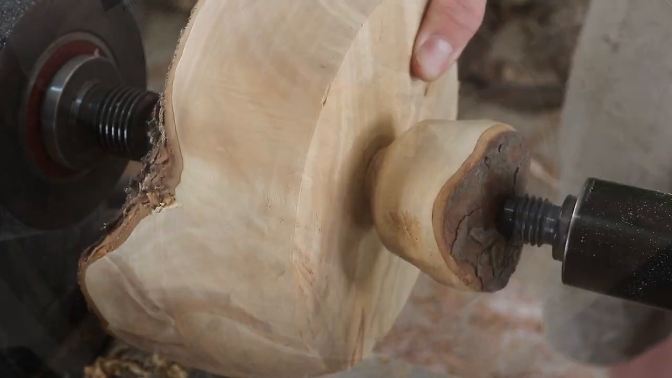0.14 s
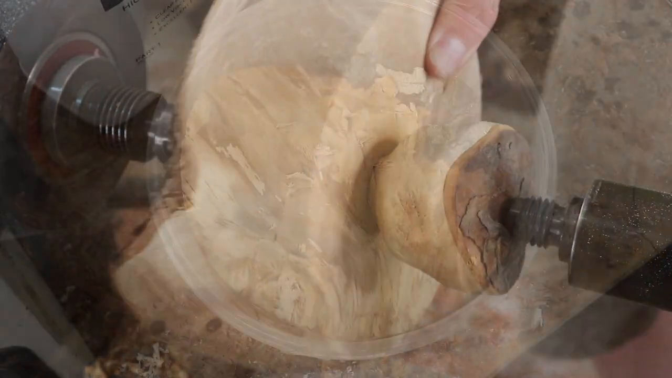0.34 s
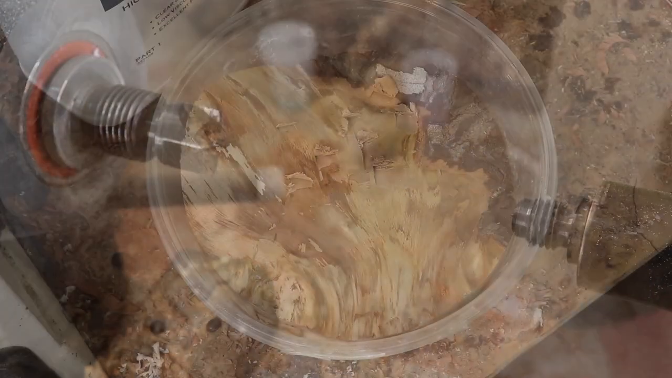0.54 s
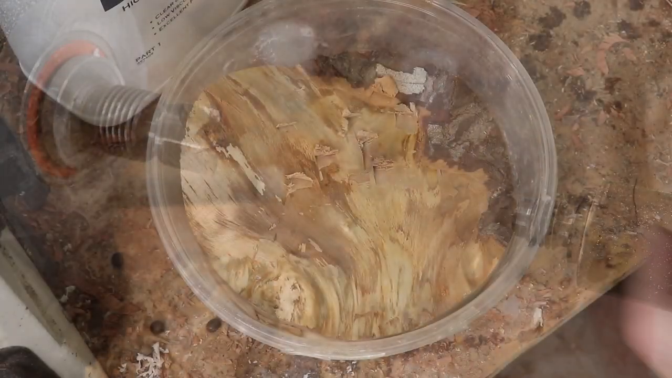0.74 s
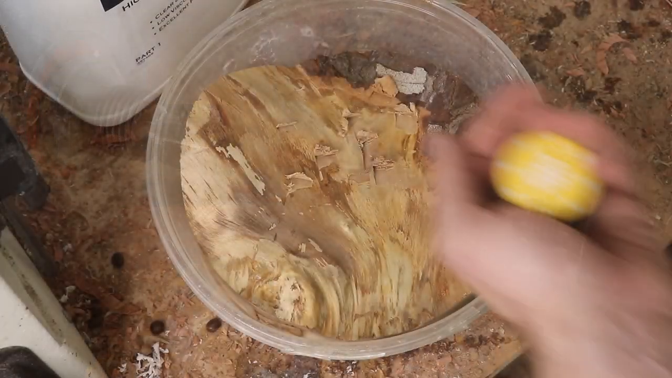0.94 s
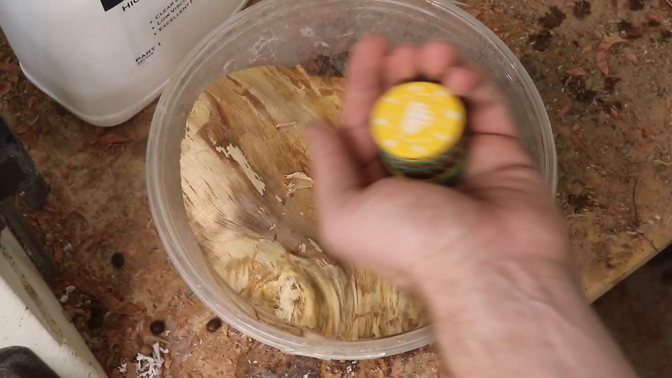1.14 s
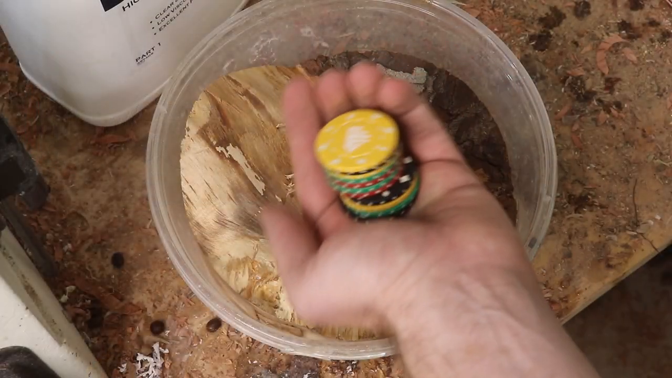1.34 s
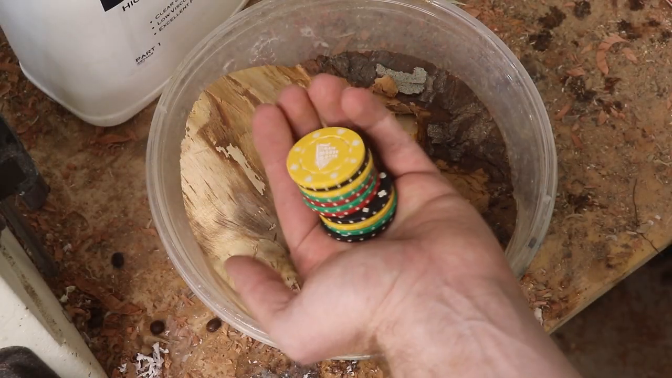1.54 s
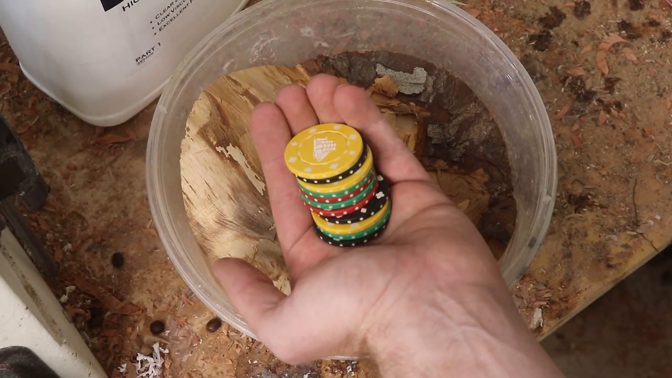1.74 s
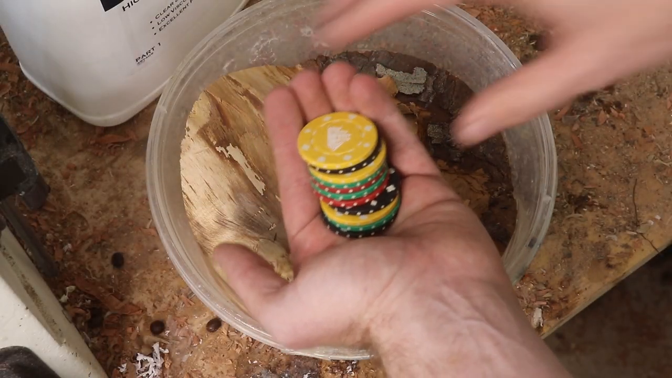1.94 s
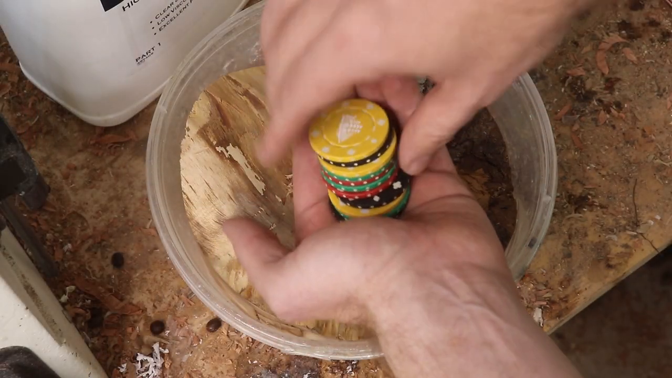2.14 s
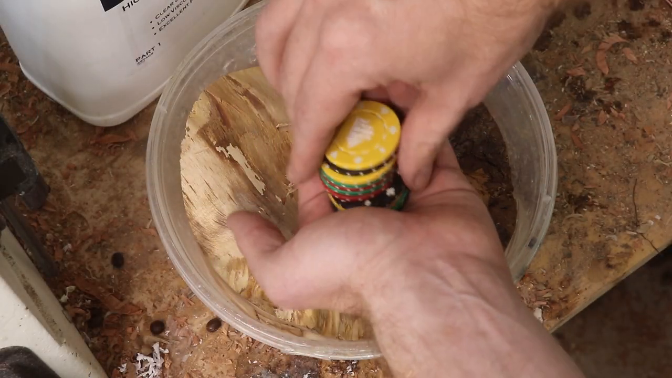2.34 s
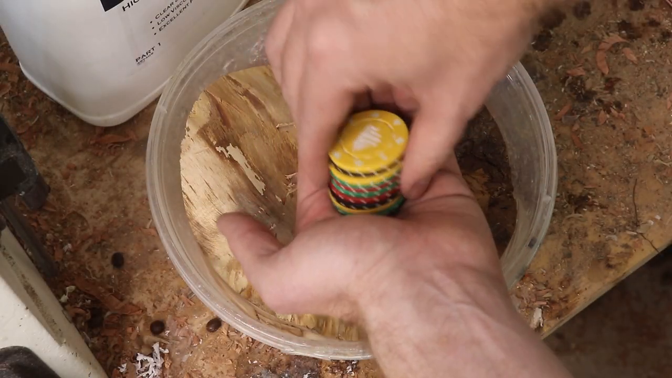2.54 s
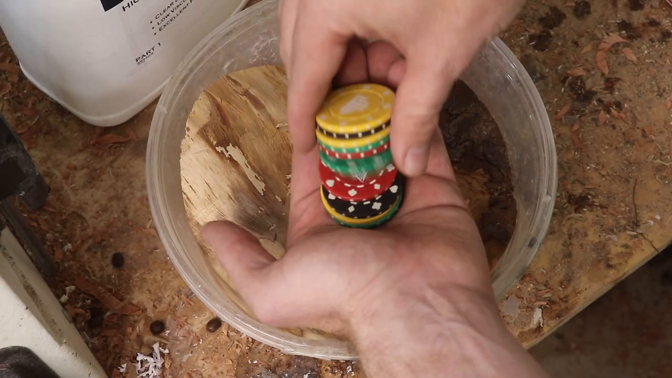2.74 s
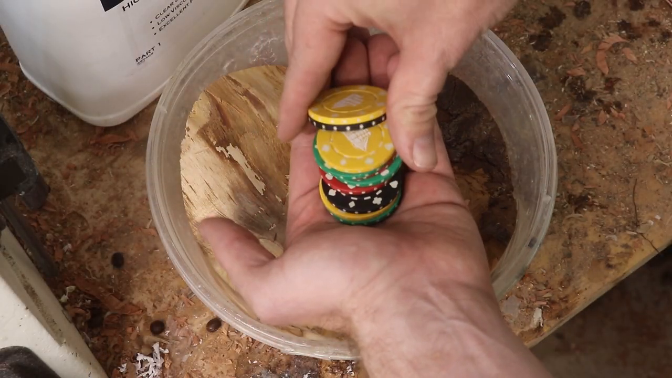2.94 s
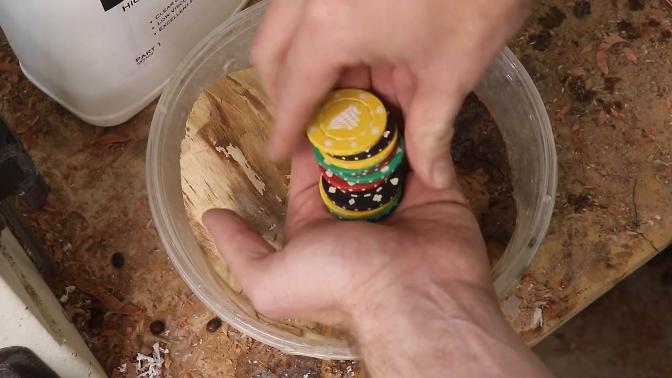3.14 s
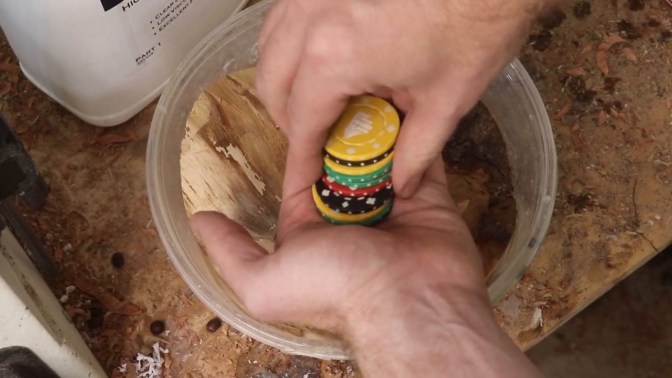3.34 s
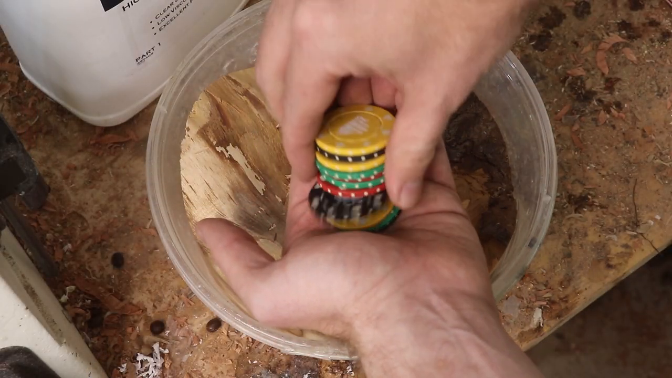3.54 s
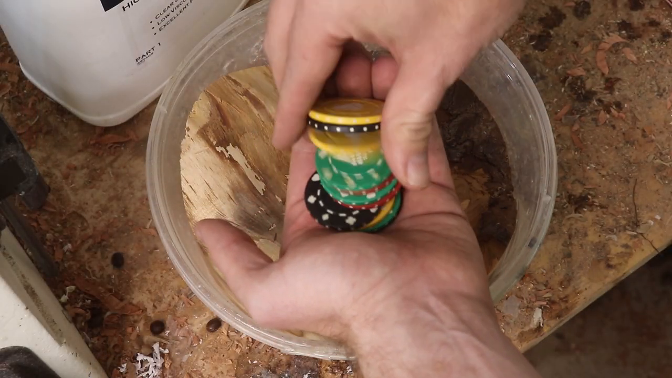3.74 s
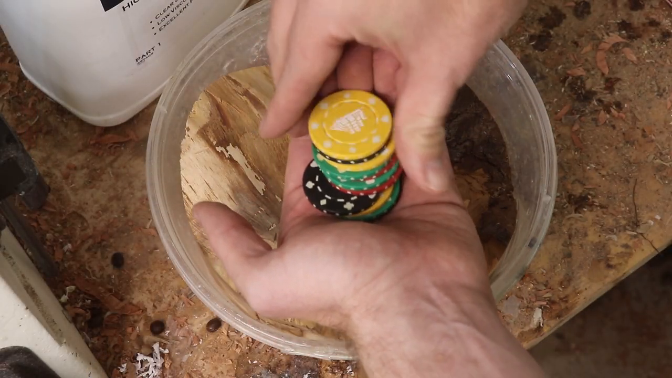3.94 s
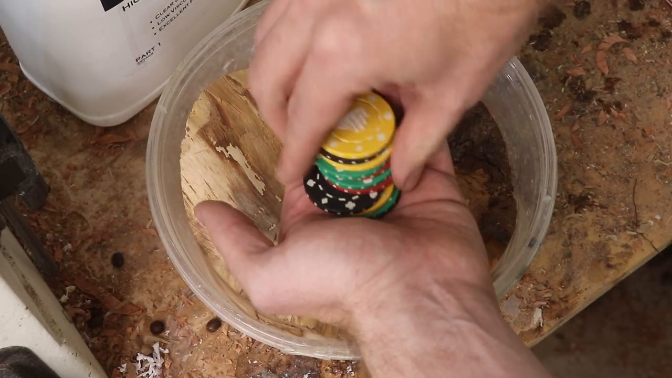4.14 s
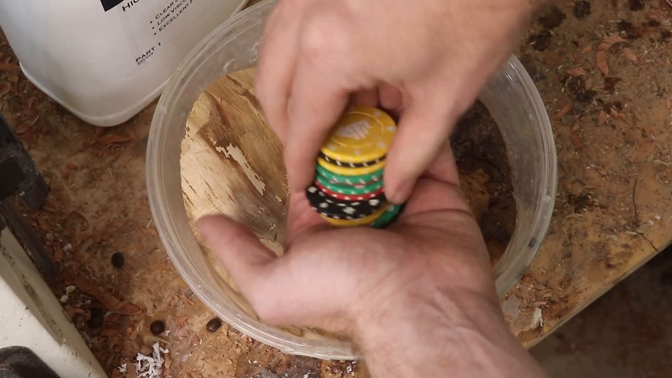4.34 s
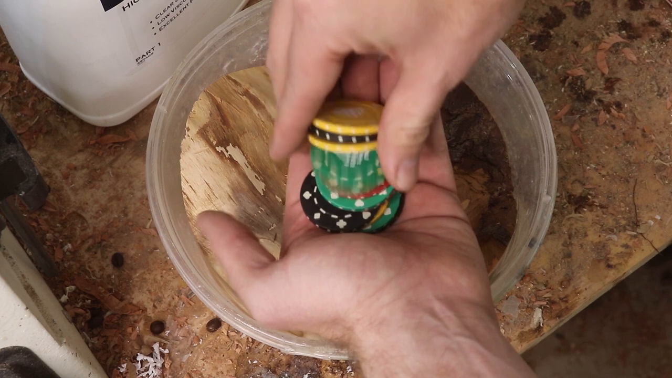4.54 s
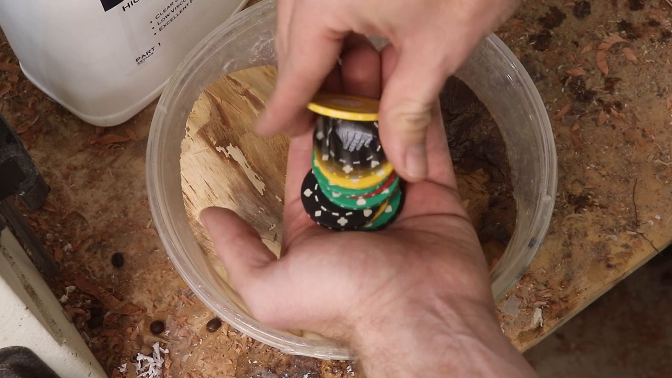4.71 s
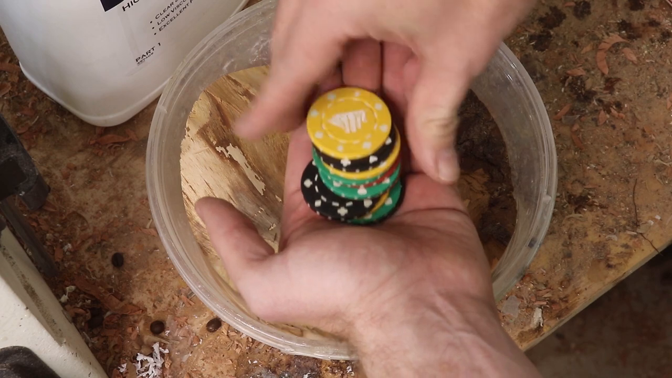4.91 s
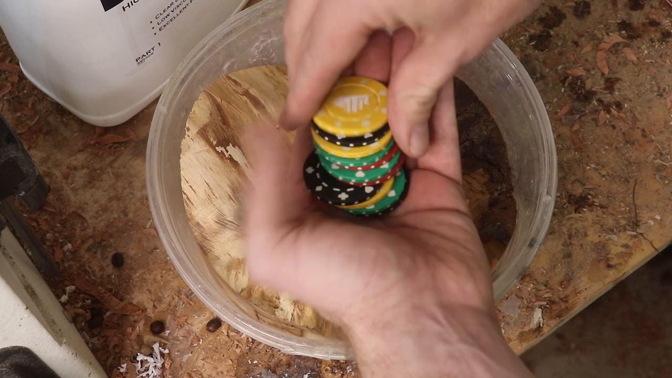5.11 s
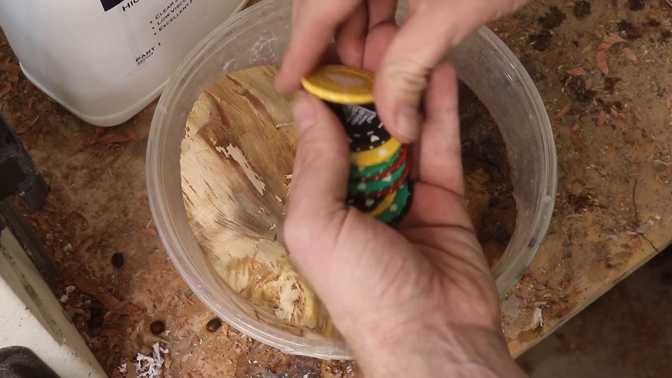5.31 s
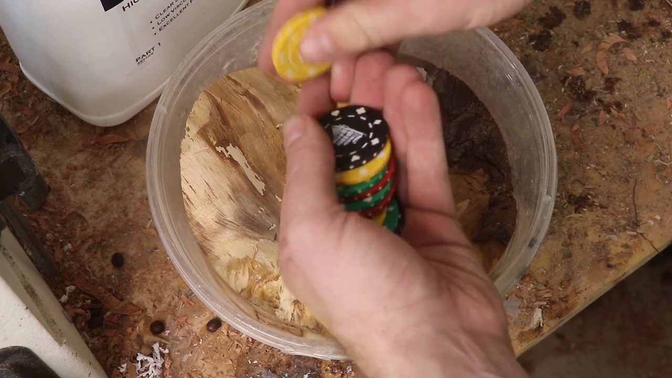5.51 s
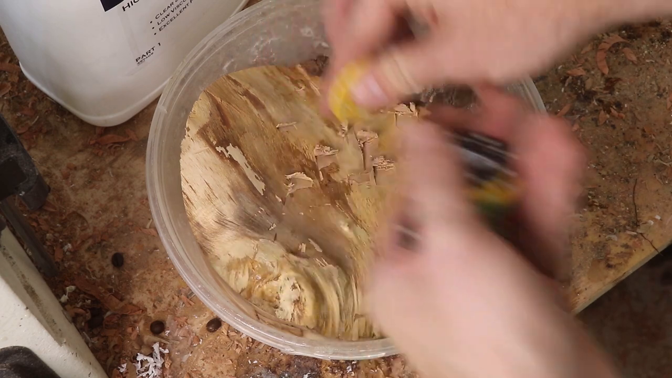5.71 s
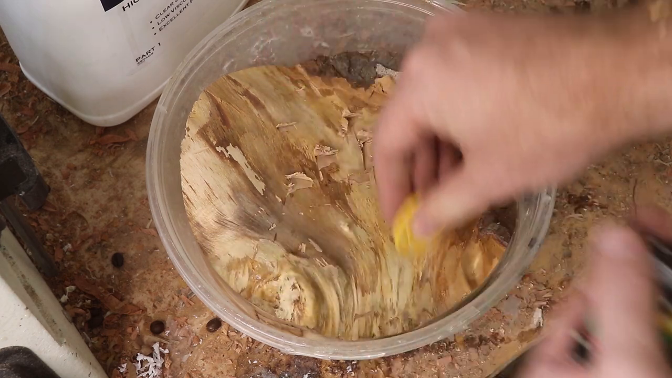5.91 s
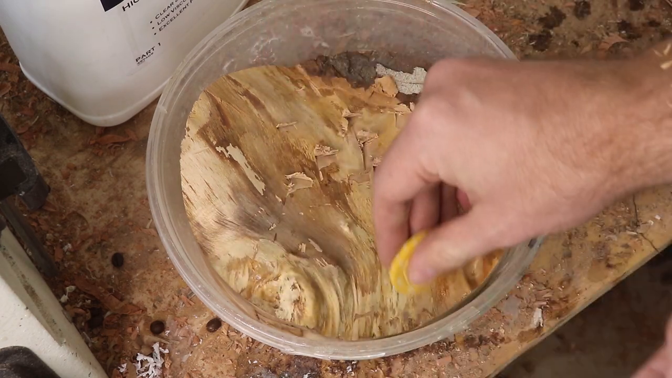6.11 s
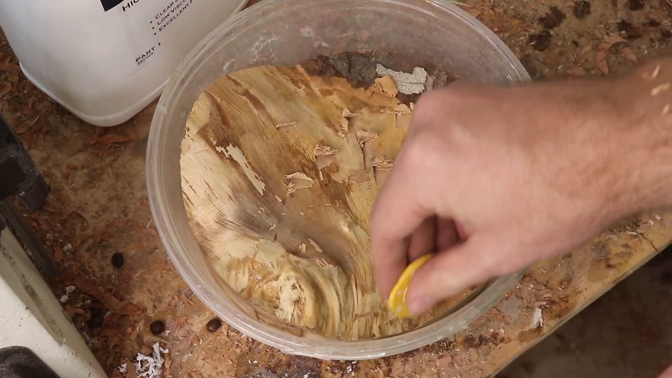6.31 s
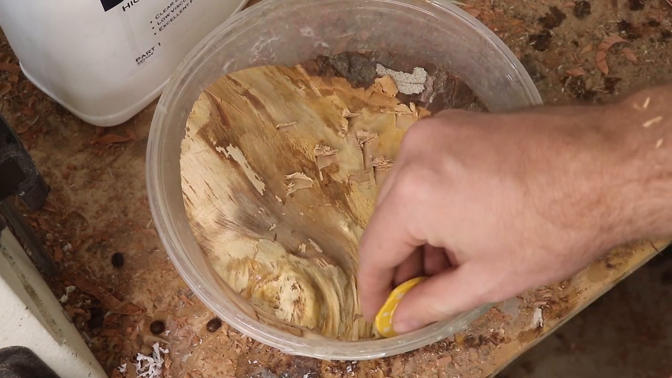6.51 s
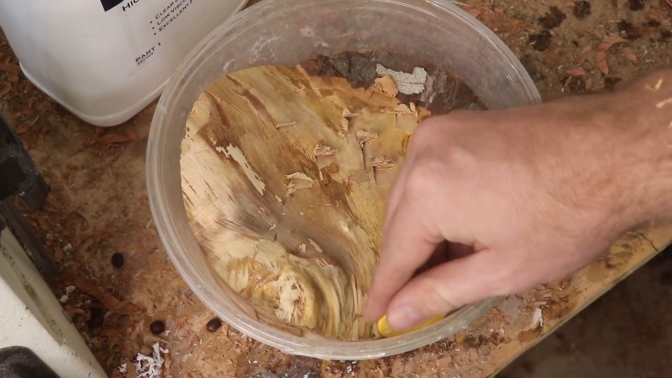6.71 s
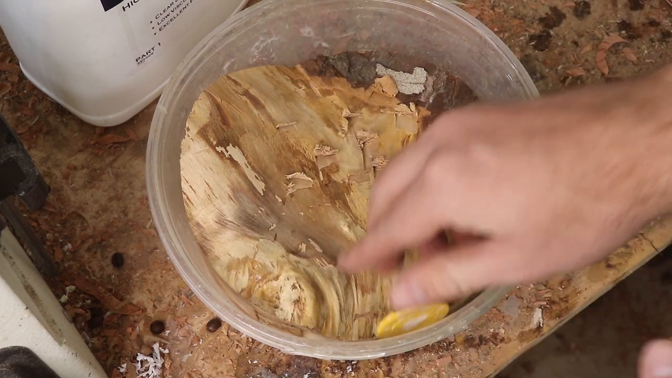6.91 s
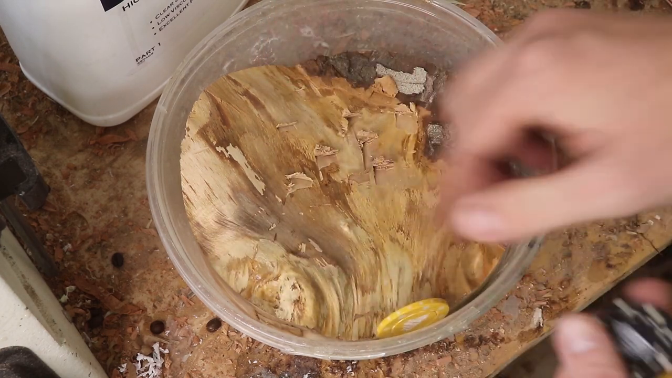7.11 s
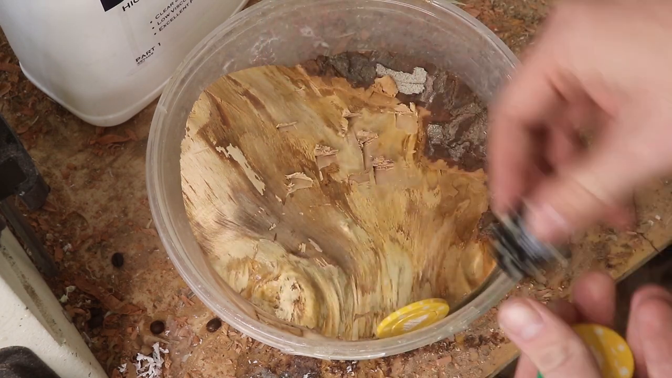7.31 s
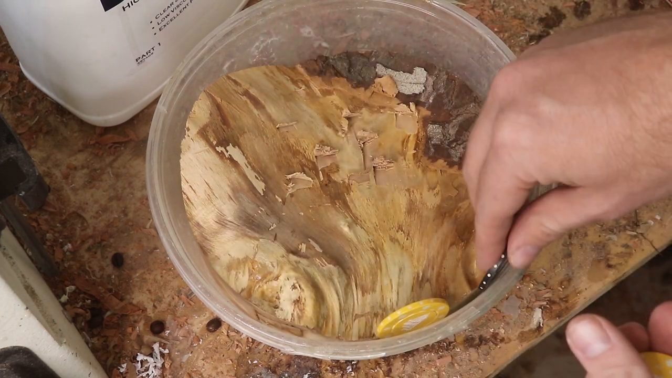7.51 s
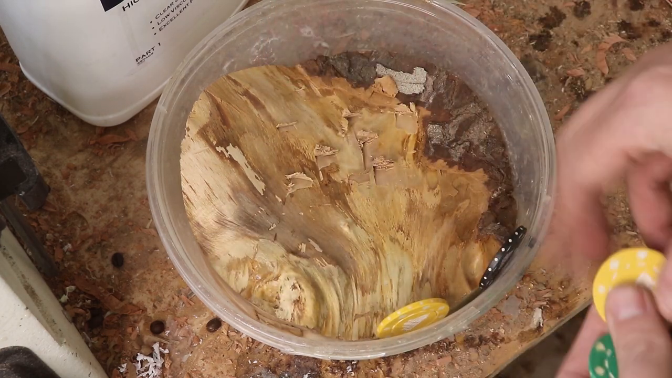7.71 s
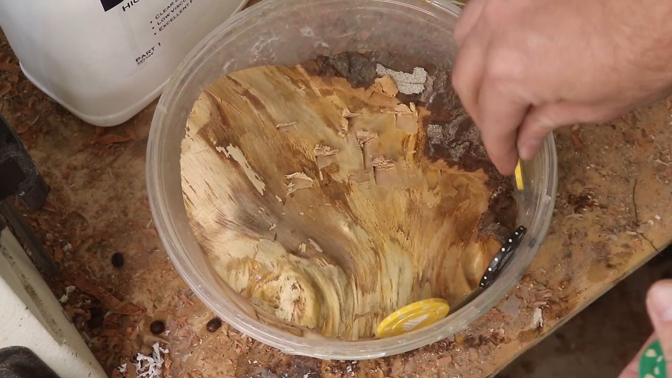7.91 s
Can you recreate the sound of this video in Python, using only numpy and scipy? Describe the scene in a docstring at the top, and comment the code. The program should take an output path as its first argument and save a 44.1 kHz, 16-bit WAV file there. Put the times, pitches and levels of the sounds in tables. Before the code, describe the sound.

A wooden blank rumbles and judders briefly on a hand-turned lathe, then poker chips clatter sharply in a palm and knock against a plastic tub.

```python
"""A stack of metal-cored poker chips falls three times in the palm: every blow is a broadband crack plus
decaying disc modes, and sliding faces are runs of tiny blows. Before this a wooden blank is turned by hand
on a lathe: narrow-band rumble and juddering, resonant noise. Afterwards single chips are wedged between the
wood and a plastic tub: damped modes, friction noise and squeaks. Hands rustle over coloured room hiss,
with one faint rumble; a limiter ducks the whole scene, hiss included, under the clatter."""
import sys
import numpy as np
from scipy import signal
from scipy.fft import rfft, irfft, next_fast_len
from scipy.io import wavfile
from scipy.ndimage import uniform_filter1d

SR = 44100
rng = np.random.default_rng(int(sys.argv[2]) if len(sys.argv) > 2 else 0)


def master_out(mix):
    """Clip the mix to full scale and print it as 16-bit PCM to the path in sys.argv[1]."""
    frames = np.transpose(np.atleast_2d(mix))
    ceiling = np.clip(frames, -1, 1)
    pcm = np.round(ceiling * 32767).astype(np.int16)
    wavfile.write(sys.argv[1], SR, pcm)


N = 355446  # length in samples


def amp(db):
    """Logarithmic level: decibels to linear gain."""
    return 10 ** (np.asarray(db) / 20)


def unit(x):
    """Normalization: scales to rms 1."""
    return x / np.sqrt(np.mean(x ** 2) + 1e-20)


def read(points, hz):
    """Interpolation of a table on a log-frequency axis."""
    f, value = np.transpose(points)
    return np.interp(np.log(hz + 1), np.log(f + 1), value)


def add(mix, s, sound):
    """Superposition: adds a stereo sound at time s."""
    part = mix[:, max(round(s * SR), 0):][:, :sound.shape[1]]
    part += sound[:, :part.shape[1]]


def noise(size, gain, alike):
    """Spectral shaping: stereo noise of rms 1 with gain and left-right correlation set by frequency."""
    padded = next_fast_len(size)
    hz = np.fft.rfftfreq(padded, 1 / SR)
    a, b = rfft(rng.standard_normal((2, padded)))
    c = np.clip(alike(hz), -1, 1)
    left_right = np.array([a, c * a + np.sqrt(1 - c ** 2) * b])
    return unit(irfft(left_right * gain(hz), padded)[:, :size])


def near(hz, alike=0.17):
    """Interchannel correlation of a close source, the same at all frequencies."""
    return alike + 0 * hz


def band(low_hz, high_hz, order=3):
    """Band-pass response with soft edges."""
    def gain(hz):
        low_edge = 1 + (low_hz / (hz + 1)) ** (2 * order)
        high_edge = 1 + (hz / high_hz) ** (4 * order)
        return 1 / np.sqrt(low_edge * high_edge)
    return gain


def ring(t, hz, db, t60, spread=0.79):
    """Modal decay: an exponentially dying sine with its own phase in each channel."""
    phase = spread * rng.standard_normal((2, 1))
    return amp(db - 60 * t / t60) * np.sin(2 * np.pi * hz * t + phase)


def ripple(hz, depth_db=4, delay=0.0033, count=10):
    """Interference: random spectral peaks and dips from touching parts; delay in s."""
    waves = np.cos(2 * np.pi * (hz[:, None] * delay * rng.random(count) + rng.random(count)))
    return amp(depth_db * unit(waves.sum(1)))


def grain(size, rough_db=4, count=60):
    """Amplitude modulation by uneven grip: random flutter smoothed over count samples."""
    flutter = unit(uniform_filter1d(rng.standard_normal(size), count))
    return unit(amp(rough_db * flutter))


# a stroke swells for this share of its length and is this many dB down at both ends
STROKE_RISE_SHARE, STROKE_FALL_DB = .38, 21.5


def swell(t, length):
    """Gaussian envelope, a parabola in dB, of a stroke that peaks at t = 0."""
    share = np.where(t < 0, STROKE_RISE_SHARE, 1 - STROKE_RISE_SHARE)
    return -STROKE_FALL_DB * (t / (length * share)) ** 2


def strokes(rows, low_hz, skirt_db):
    """Dry friction: short strokes of noise, a main band over a faint wide skirt."""
    out = np.zeros((2, N))
    for s, length, db, high_hz in rows:
        t = np.arange(-min(s, length), 1.5 * length, 1 / SR)

        def colour(hz):
            main = band(low_hz, high_hz, order=4)(hz)
            skirt = amp(skirt_db) * band(low_hz / 3, high_hz * 2.5, order=1)(hz)
            return ripple(hz) * (main + skirt)

        rub = grain(len(t)) * noise(len(t), colour, lambda hz: near(hz, alike=.3))
        add(out, s + t[0], amp(db + swell(t, length)) * rub)
    return out


# room tone spectrum: frequency_hz [Hz], relative density_db [dB per Hz]
ROOM_SPECTRUM = [(15, -43.5), (25, -19.5), (64, -1.5), (223, -9), (263, -13.5), (317, -12), (489, -15),
                 (607, -14), (962, -14.5), (2350, -24), (6210, -29), (16000, -44)]
# stereo width of the room tone: frequency_hz [Hz], side_minus_mid_db [dB]
ROOM_WIDTH = [(60, -19), (240, -8), (950, -4), (3770, 2), (15000, -1.5)]
HISS_DB = -58


def room_tone(drone_hz=640, drone_width_hz=55, drone_db=5):
    """Diffuse field: steady workshop hiss with a soft airy resonance; the bass is nearly mono."""
    def colour(hz):
        resonance_db = drone_db / (1 + ((hz - drone_hz) / drone_width_hz) ** 2)
        return amp(read(ROOM_SPECTRUM, hz) + resonance_db)

    def alike(hz):
        return 2 / (1 + amp(read(ROOM_WIDTH, hz)) ** 2) - 1

    return amp(HISS_DB) * noise(N, colour, alike)


RUMBLE_S, RUMBLE_LENGTH_S, RUMBLE_DB = 4.33, 0.55, -61  # between the second and third fall


def rumble(low_hz=55, high_hz=100):
    """Band-limited noise: one faint low rumble swells and fades."""
    level = amp(RUMBLE_DB + swell(np.arange(N) / SR - RUMBLE_S, RUMBLE_LENGTH_S))
    return level * noise(N, band(low_hz, high_hz, order=4), lambda hz: near(hz, alike=.6))


# reverberation of the small room: frequency_hz [Hz], t60_s [s]
ROOM_DECAY = [(200, 1), (1200, 0.94), (2500, 0.54), (6300, 0.37), (9000, 0.4), (16000, 0.25)]


def workshop(x, early_db=-12, early_t60=.05, tail_db=-14):
    """Reverberation: quick reflections from tub and bench, then the tail of a small room."""
    t = np.arange(SR * 2 // 3) / SR
    sparse = rng.random((2, len(t))) < .15
    taps = rng.standard_normal((2, len(t))) * sparse * (t > .002)
    # each frequency of the tail decays at its own rate
    hz, when, z = signal.stft(taps * (t > .007), SR, nperseg=256)
    decay = amp(-60 * when / read(ROOM_DECAY, hz)[:, None])
    tail = signal.istft(z * decay, SR, nperseg=256)[1][:, :len(t)]
    early = unit(taps * amp(-60 * t / early_t60))
    echo = (amp(tail_db) * unit(tail) + amp(early_db) * early) / np.sqrt(len(t))
    return x + signal.fftconvolve(x, echo, axes=1)[:, :N]


# skin and sleeves brush as the arms move: peak_s [s], length_s [s], level_db [dB]
ARM_BRUSHES = [(0.433, 0.48, -65.5), (0.807, 0.5, -68.5), (2.048, 0.28, -76), (5.996, 0.55, -72.5),
               (7.847, 0.96, -74)]
RUSTLE_DB = -77.5  # the hands are never quite still


def rustle():
    """Soft friction: a faint uneven hiss of skin and sleeves that swells with each arm movement."""
    t = np.arange(N) / SR
    moves = sum(amp(db + swell(t - s, length)) for s, length, db in ARM_BRUSHES)
    hiss = noise(N, band(1500, 6500, order=1), near) * grain(N, rough_db=2.0, count=500)
    return (amp(RUSTLE_DB) + moves) * hiss


# soft bumps of the hands: peak_s [s], length_s [s], level_db [dB]
HAND_BUMPS = [(0.787, 0.019, -44.5), (0.857, .012, -43.5), (5.37, 0.023, -45), (6.701, .3, -63.5),
              (7.357, .05, -51), (7.555, 0.033, -52)]
BUMP_LOW_HZ, BUMP_HIGH_HZ = 115, 930


def bumps():
    """Soft contact: the hands give short bursts of low-passed noise."""
    rows = [(*row, BUMP_HIGH_HZ) for row in HAND_BUMPS]
    return strokes(rows, BUMP_LOW_HZ, skirt_db=-13)


# a chip is thumbed across the top of the stack: peak_s [s], length_s [s], level_db [dB]
CHIP_SWIPES = [(2.407, 0.08, -59), (4.309, 0.035, -53), (7.258, 0.13, -53), (7.394, .028, -37),
               (7.798, .035, -42)]
SWIPE_LOW_HZ, SWIPE_HIGH_HZ = 3910, 5600


def swipes():
    """Sliding friction: chip faces hiss in a high band."""
    rows = [(*row, SWIPE_HIGH_HZ) for row in CHIP_SWIPES]
    return strokes(rows, SWIPE_LOW_HZ, skirt_db=-16.5)


# dry scrapes on wood, a brisker one reaching higher:
# peak_s [s], length_s [s], level_db [dB], top_hz [Hz]
WOOD_SCRAPES = [(.01, 0.065, -55, 6100), (.08, 0.064, -54, 1260), (.345, 0.031, -50.5, 3000),
                (.478, 0.019, -32, 7940), (.496, .022, -35, 7840), (.545, .012, -35, 5000),
                (3.39, .02, -48.5, 4430), (6.512, 0.011, -43.5, 6840), (6.71, .15, -52.5, 2610),
                (7.553, .022, -31.5, 3360), (7.57, .1, -50, 1300), (7.635, .025, -56.5, 2990),
                (7.989, 0.031, -40, 5530), (8.058, 0.029, -33.5, 5450)]
SCRAPE_LOW_HZ = 741


def scrapes():
    """Dry friction: scraped wood gives noise from the middle range up to each stroke's top."""
    return strokes(WOOD_SCRAPES, SCRAPE_LOW_HZ, skirt_db=-13.5)


# a chip is wedged against the plastic: peak_s [s], half_length_s [s], level_db [dB], pitch_hz [Hz]
WEDGE_SQUEAKS = [(8.024, 0.0193, -41.5, 905), (8.006, .016, -48, 1350)]


def squeaks(waver=0.023, overtone_db=-25):
    """Stick-slip oscillation: a moment of stick and slip gives a rough, wavering tone."""
    out = np.zeros((2, N))
    for s, half, db, hz in WEDGE_SQUEAKS:
        t = np.arange(-3 * half, 3 * half, 1 / SR)
        drift = unit(uniform_filter1d(rng.standard_normal(len(t)), size=200))
        pitch = hz * (1 + waver * drift)
        phase = 2 * np.pi * np.cumsum(pitch) / SR + .5 * rng.standard_normal((2, 1))
        tone = unit(np.sin(phase) + amp(overtone_db) * np.sin(2 * phase))
        tone = tone * grain(len(t), rough_db=3.0, count=150)
        add(out, s + t[0], amp(db) * np.exp(-(t / half) ** 2) * tone)
    return out


# small hollow ticks of the handled chips: start_s [s], level_db [dB], pitch_hz [Hz]
HOLLOW_TICKS = [(2.303, -40, 1540), (2.639, -49.5, 2857), (3.524, -49, 2880), (4.388, -38, 1533),
                (7.458, -46.5, 1590), (7.912, -45.5, 1500)]


def ticks(t60=.03):
    """Impulse response: a single slip excites one damped, hollow mode."""
    out, t = np.zeros((2, N)), np.arange(SR // 10) / SR
    for s, db, hz in HOLLOW_TICKS:
        add(out, s, ring(t, hz, db, t60))
    return out


SPIN_START_HZ, SPIN_GAIN_HZ_PER_S, SPIN_DB = 102, 105, -48.5  # the spindle speeds up
SPIN_STOP_S, SPIN_RELEASE_S = .61, 0.017


def spindle(width_hz=45):
    """Quadrature modulation: the hand-turned spindle's narrow-band rumble follows its speed."""
    t = np.arange(N) / SR

    def slow():
        return noise(N, lambda f: 1 / (1 + (f / width_hz) ** 2), near)

    turn = 2 * np.pi * np.cumsum(SPIN_START_HZ + SPIN_GAIN_HZ_PER_S * t) / SR
    turning = np.clip((SPIN_STOP_S - t) / SPIN_RELEASE_S, 0, 1)
    return amp(SPIN_DB) * turning * (slow() * np.cos(turn) + slow() * np.sin(turn))


# the blank catches and slips: start_s [s], level_db [dB] before the attack ramp
BLANK_JUDDERS = [(.541, -20.5), (0.57, -26)]
# resonances of the wooden blank: centre_hz [Hz], width_hz [Hz], relative level_db [dB]
BLANK_MODES = [(325, 320, -5.5), (707, 51, 2.5), (850, 63, -3.5), (1130, 140, 1), (1310, 220, -4.5),
               (1720, 49, 4.5), (1980, 210, -5.5), (2260, 140, -0.5)]
JUDDER_ATTACK_S, JUDDER_FALL_DB_PER_S = 0.0031, 462


def grind(edge_hz=2050, release_s=0.0068):
    """Source and filter: each slip of the juddering blank is noise shaped by the wood's resonances."""
    t = np.arange(N) / SR
    force = 0
    for s, db in BLANK_JUDDERS:
        attack = np.clip((t - s) / JUDDER_ATTACK_S, 0, 1)
        force += amp(db - JUDDER_FALL_DB_PER_S * abs(t - s)) * attack
    turning = np.clip((SPIN_STOP_S - t) / release_s, 0, 1)

    def colour(f):
        power = sum(amp(level) ** 2 / (1 + (2 * (f - hz) / width) ** 2)
                    for hz, width, level in BLANK_MODES)
        return band(110, edge_hz, order=3)(f) * np.sqrt(power)

    rub = grain(N, rough_db=2.0) * noise(N, colour, lambda hz: near(hz, alike=0.062))
    return force * turning * rub


# crack of a hard contact: frequency_hz [Hz], relative density_db [dB per Hz]
CRACK_SPECTRUM = [(100, -33.5), (600, -34), (1400, -18.5), (2400, -5.5), (3500, -8.5), (3950, 2),
                  (4600, -5.5), (5500, 2.5), (6600, -4), (7600, -12.5), (8900, -5.5), (11000, -15.5),
                  (13200, -15), (16000, -18)]


def crack(t, t60=0.013, snap=3.62, size=8):
    """Impulsive excitation: a contact's hard snap, then a quickly damped, dense ring."""
    hz = np.fft.rfftfreq(len(t), 1 / SR)
    blow = noise(len(t), np.ones_like, lambda f: near(f, alike=0.27)) * amp(-60 * t / t60)
    blow[:, 0] = snap
    colour = amp(read(CRACK_SPECTRUM, hz)) * ripple(hz, depth_db=3.0, delay=0.001302)
    delayed = np.roll(blow, size, axis=1)
    return irfft(rfft(delayed) * unit(colour), len(t)) * (t < t[-1] / 2)


# a chip's edge knocks on the tub and the wood in it:
# start_s [s], level_db [dB], brightness [dB per octave]
TUB_KNOCKS = [(6.0445, -27.5, -8.5), (6.135, -41.5, -13), (6.266, -24, 8.5), (6.512, -38.5, -5.5),
              (6.646, -40.5, 0), (6.822, -47, -16), (7.509, -37.5, -11), (7.551, -35, 1), (7.987, -34, 1)]
# modes of the tub: frequency_hz [Hz], level_db [dB] at zero brightness, t60_s [s]
TUB_MODES = [(593, -32, 0.15), (847, -19.5, 0.12), (1159, -6.5, 0.037), (1257, 1, 0.019), (1522, -5, 0.02),
             (1755, -14.5, 0.032), (2205, -9, 0.035), (2410, -3, 0.032), (2480, -35, 0.31),
             (3850, -18, 0.014), (8950, -74, 0.043)]


def tub(centre_hz=1300, tick_db=-16, tick_per_bright=0.064):
    """Modal excitation: a harder knock on the tub favours the upper modes and the dry tick."""
    out, t = np.zeros((2, N)), np.arange(SR // 5) / SR
    onset = 1 - np.exp(-t / 0.00022)
    for s, db, bright in TUB_KNOCKS:
        body = 0
        for hz, level, t60 in TUB_MODES:
            body += ring(t, hz, level + bright * np.log2(hz / centre_hz), t60, spread=0.27)
        tick = amp(tick_db + tick_per_bright * bright) * crack(t, t60=0.0078)
        add(out, s, amp(db) * (body * onset + tick))
    return out


# modes of a chip, all following the pitch of the strongest:
# nominal frequency_hz [Hz], relative level_db [dB], ring_factor [multiple of the blow's t60]
CHIP_MODES = [(3932, -20, 2), (6024, -4, 0.68), (6353, 1.5, 0.75), (8875, -15.5, 1.1), (13060, -17.5, 0.97),
              (15500, -27, .5)]
CHIP_HZ = 6350  # nominal pitch
RING_OVER_DB = 4  # disc ring over the crack in a falling blow


def click(crack_db, ring_db, hz, t60, scatter_db=3.0, detune=.012, rise=.00029, size=5120):
    """Modal synthesis: a chip's blow is a crack plus disc modes that ring as long as the grip allows."""
    t = np.arange(size) / SR
    modes = 0
    for mode_hz, db, life in CHIP_MODES:
        # the weaker modes away from the main pitch depend on where the disc is hit
        stray = rng.standard_normal(2) * (abs(mode_hz / CHIP_HZ - 1) > .06)
        pitch = mode_hz * hz / CHIP_HZ * (1 + detune * stray[0])
        modes += ring(t, pitch, ring_db + db + scatter_db * stray[1], t60 * life, spread=0.97)
    return amp(crack_db) * crack(t) + modes * (1 - np.exp(-t / rise))


# chip faces slip and chatter over each other:
# start_s [s], end_s [s], level_db [dB] of a collision's crack before random spread
FACE_SLIDES = [(2.724, 2.76, -37.5), (2.784, 2.80, -33.5), (2.926, 2.959, -34), (2.96, 3.023, -27),
               (3.028, 3.068, -40.5), (3.296, 3.394, -58), (3.742, 3.783, -25), (3.792, 3.885, -45),
               (3.884, 3.912, -29), (3.934, 3.958, -33.5), (4.498, 4.531, -40.5), (4.616, 4.681, -35.5),
               (4.803, 4.885, -36), (5.118, 5.159, -60.5)]


def slides(ring_over_db=12, spread_db=4, hz=6230, pitch_spread=.04, t60=0.0075):
    """Micro-impacts: sliding faces make a run of tiny soft collisions, with more ring than crack."""
    out = np.zeros((2, N))
    per_s = 420  # collisions per second
    for start, end, db in FACE_SLIDES:
        count = max(int((end - start) * per_s), 1)
        for k, (when, size, pitch) in enumerate(rng.uniform(-0.91, 1, (count, 3))):
            level = db + spread_db * size
            pitch_hz = hz * (1 + pitch_spread * pitch)
            hit = click(level, level + ring_over_db, pitch_hz, t60, size=2048)
            add(out, start + (k + .5 + .5 * when) / per_s, hit)
    return out


# a chip lands on a chip, ringing longer the looser it lies:
# start_s [s], crack_level_db [dB], ring_t60_s [s] before each mode's factor
CHIP_BLOWS = [(.643, -47.5, .005), (0.827, -44, 0.0028), (0.8607, -24, 0.027), (2.355, -37.5, 0.0085),
              (2.7264, -26, 0.018), (2.750, -27.5, 0.016), (2.7779, -20, .014), (2.7862, -12.5, 0.022),
              (2.8309, -5.5, 0.021), (2.8892, -11, 0.043), (2.8996, -7.5, 0.039), (3.0217, -14, 0.027),
              (3.1197, -19, .02), (3.1234, -3.5, 0.036), (3.162, -24.5, 0.083), (3.1928, -10.5, 0.028),
              (3.2293, -26.5, 0.06), (3.659, -14, 0.046), (3.692, -4, 0.027), (3.7248, -15, .045),
              (3.7481, -13.5, 0.068), (3.781, -18, 0.064), (3.824, -28.5, 0.033), (3.841, -9.5, 0.022),
              (3.851, -23.5, 0.053), (3.9032, -22, 0.048), (3.959, -7.5, 0.015), (3.993, -26, .043),
              (4.037, -11, 0.019), (4.068, -34, 0.032), (4.218, -51, .005), (4.433, -47, .005),
              (4.498, -25.5, 0.042), (4.5693, -27, 0.035), (4.6007, -16.5, 0.023), (4.6126, -3, 0.048),
              (4.633, -19.5, 0.014), (4.657, -19, .016), (4.6714, -18.5, 0.029), (4.7633, -29.5, 0.064),
              (4.785, -5, 0.045), (4.8314, -11, 0.02), (4.9185, -10, 0.036), (4.980, -17.5, 0.033),
              (5.247, -36.5, 0.0057), (5.60, -57, .005)]
# a grip that shortens the ring also raises its pitch; each blow strays a little
FREE_HZ, GRIP_HZ, GRIP_T60_S, STRAY_HZ = 6194, 287, .04, 45


def falls(neighbour_t60=.0043, pitch_spread=.046, pass_s=.001, loss_db_per_t60=-130, count=3):
    """Damped impact: the grip sets pitch and ring length of chips landing on the stack."""
    out = np.zeros((2, N))
    for s, db, t60 in CHIP_BLOWS:
        grip_hz = GRIP_HZ * np.exp(-t60 / GRIP_T60_S)
        hz = FREE_HZ + grip_hz + STRAY_HZ * rng.standard_normal()
        add(out, s, click(db, db + RING_OVER_DB, hz, t60))
        # the blow passes on to neighbours; a loose, long-ringing chip passes on less
        for k, (lag, pitch) in enumerate(rng.uniform(-1, 1, (count, 2)), 1):
            passed_db = db + k * loss_db_per_t60 * t60  # loss in dB per second of t60
            pitch_hz = hz * (1 + pitch_spread * pitch)
            passed = click(passed_db, passed_db + RING_OVER_DB, pitch_hz, neighbour_t60, size=2048)
            add(out, s + (k + .5 * lag) * pass_s, passed)
    return out


def chips(left_db=-1.15, right_db=2.0):
    """Level panning: the stack falls and slides in the palm, a little to the right."""
    return (falls() + slides()) * amp([[left_db], [right_db]])


def scene():
    """Superposition of all sources in the workshop."""
    background = room_tone() + rumble()
    hands = rustle() + bumps() + swipes() + scrapes() + squeaks() + ticks()
    handling = workshop(hands, early_db=-11.0, early_t60=0.069, tail_db=-21.0)
    lathe = spindle() + grind()
    knocks = workshop(tub(), early_db=-5.5, early_t60=0.081, tail_db=-14.5)
    clatter = workshop(chips(), early_db=-12.5, early_t60=0.044, tail_db=-16.5)
    return background + handling + lathe + knocks + clatter


EDGE_HZ = 16100  # upper band limit


def record(dry, ceiling_db=-13, recovery_db_per_s=42, full_scale=0.3, range_db=11):
    """Dynamic compression: fast ducking with slow release, then peak rounding and a band limit."""
    power = uniform_filter1d(dry ** 2, size=60, axis=1).max(0)
    over_db = np.clip(10 * np.log10(abs(power) + 1e-12) - ceiling_db, 0, range_db)
    # a running maximum against a ramp gives a steady release in dB
    ramp = np.arange(N) / SR * recovery_db_per_s
    duck_db = np.maximum.accumulate(over_db + ramp) - ramp
    held = dry * amp(-duck_db)
    held = held / (1 + (held / full_scale) ** 4) ** (1 / 4)
    edge = signal.firwin(255, EDGE_HZ, window=("kaiser", 8), fs=SR)
    return signal.oaconvolve(held, edge[None], "same", axes=1)


dry = scene()
out = record(dry)
master_out(out)
```